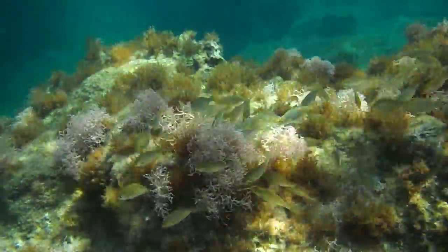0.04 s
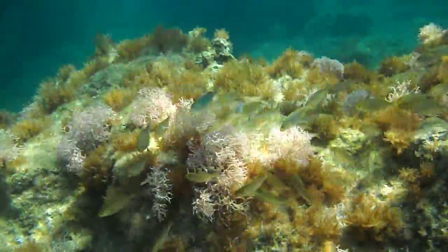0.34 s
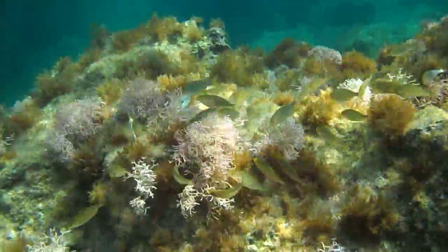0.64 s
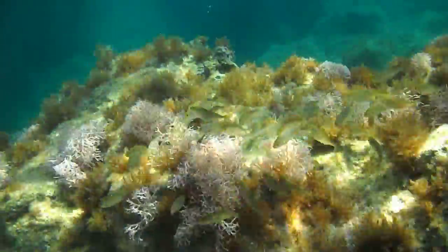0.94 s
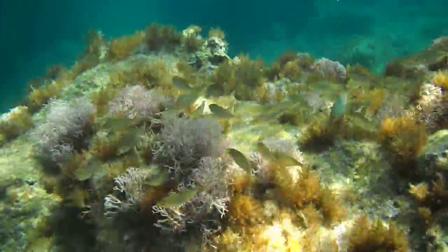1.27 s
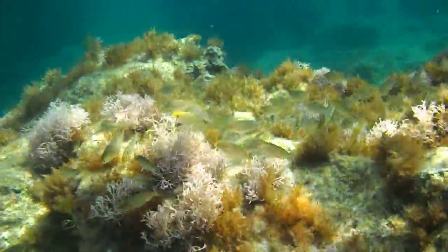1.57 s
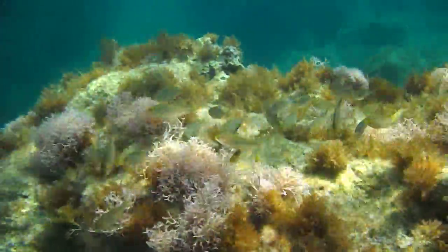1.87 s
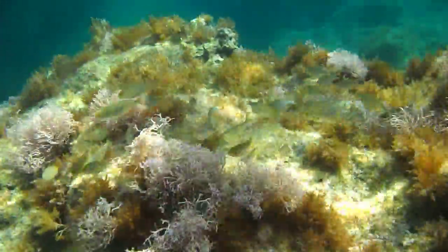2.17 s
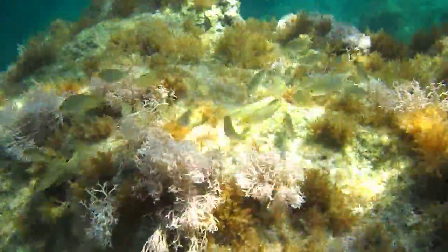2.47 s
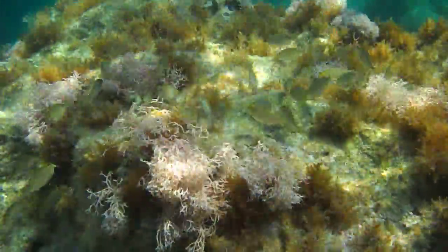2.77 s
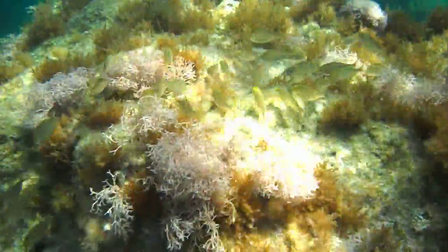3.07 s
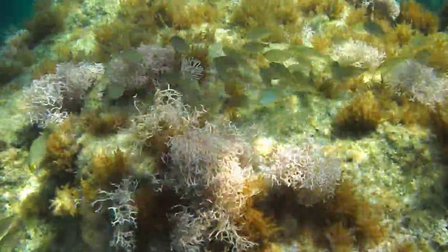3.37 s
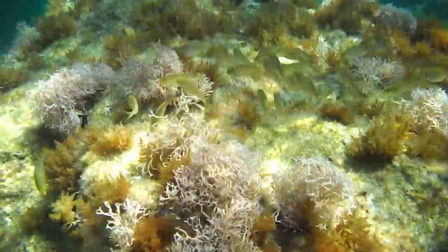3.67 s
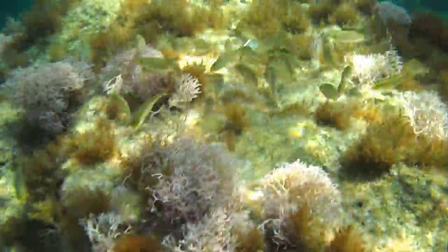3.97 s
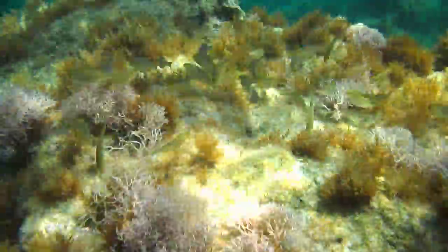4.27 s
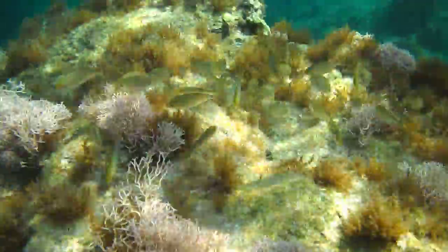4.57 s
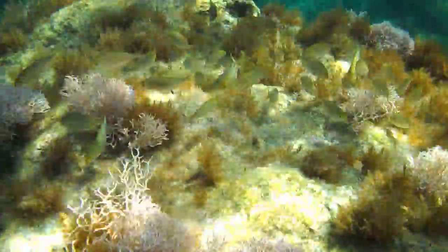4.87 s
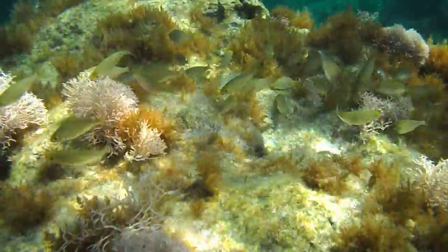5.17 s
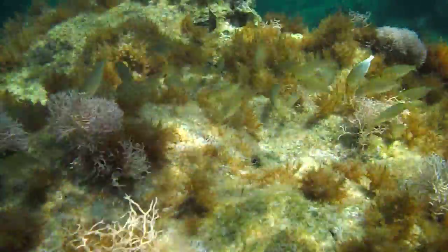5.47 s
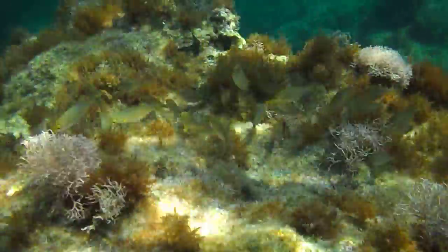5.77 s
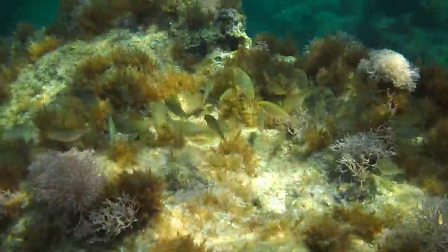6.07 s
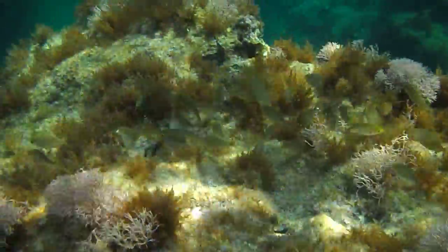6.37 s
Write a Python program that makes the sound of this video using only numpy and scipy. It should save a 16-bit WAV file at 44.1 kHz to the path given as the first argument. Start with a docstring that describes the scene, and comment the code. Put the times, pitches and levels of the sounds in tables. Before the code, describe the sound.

Sharp shrimp clicks and crackles cut through a close, high electronic buzz, over a soft underwater wash with small bubbles.

```python
"""Shallow sea, over a weedy rock, heard from one camera microphone inside a waterproof housing.
From the start the electronics whine close by; snapping shrimp click near and far and ring the housing,
small bubbles plink in a soft wash of water, and a faint, distant motor comes and goes as it slows.
The housing knocks at 1.4 s, and a cloud of bubbles gurgles at 4.1 s.
Just after 5 s the housing knocks twice more, then gives one stick-slip squeak."""
import sys
import numpy as np
from scipy import signal
from scipy.fft import rfft, irfft, next_fast_len
from scipy.io import wavfile
from scipy.ndimage import uniform_filter1d

SR = 44100
rng = np.random.default_rng(int(sys.argv[2]) if len(sys.argv) > 2 else 0)


def materialize(psi):
    """Save the field psi as 16-bit PCM at rate SR to the path in sys.argv[1].

    A 1-D psi becomes a single channel; in a 2-D psi each row is a channel.
    """
    bounded = np.clip(np.atleast_2d(psi).T, -1, 1)
    quanta = np.round(bounded * 32767).astype(np.int16)
    wavfile.write(sys.argv[1], SR, quanta)


N = 292816

# colour of the buzz around the whine and around its mirror image: (frequency [Hz], gain [dB])
WHINE_BUZZ = [(3000, -10), (5000, 9), (6000, 9), (7000, 9), (8000, 8.5), (9800, 8), (10330, 6.5),
              (10660, 2.5), (10820, -0.56), (11000, -6), (11470, -24), (12000, -48)]
MIRROR_BUZZ = [(9000, -46), (10330, -23), (10820, -2.5), (11200, -0.5), (11470, -1.5), (11880, -9),
               (12130, -44), (12400, -48)]
# shrimp near the microphone: (time [s], level [dB], centre [Hz], body lift [dB], edge lift [dB])
NEAR_SNAPS = [(0.2653, -34, 3500, 2, 4), (0.3884, -39.5, 3500, 0, -5), (0.6199, -35, 3800, 8, -9),
              (0.6858, -28.5, 3470, 4, 6), (0.7445, -37, 4400, -5, 12), (0.7973, -35, 3800, 0, 1),
              (0.847, -31, 4200, 20, 20), (0.9423, -24.5, 2600, 7, -2), (1.0235, -37, 4500, -16, 4),
              (1.4026, -25, 4060, -5, 9), (1.7981, -39.5, 3900, -11, 8), (1.9096, -39.0, 4000, -1, 16),
              (1.9339, -29, 3200, 16, 3), (1.9913, -36, 3800, 10, -14), (2.0714, -36.5, 3850, -4, 4),
              (2.1525, -13, 4200, 5, 4), (2.4017, -35.5, 4100, 4, -6), (2.5668, -31.5, 4280, -10, -12),
              (2.6313, -30, 4100, -18, -7), (2.7712, -34.0, 3500, -6, 11), (2.8515, -37.5, 4100, -6, -5),
              (3.226, -15.5, 3770, -5.5, 4.5), (3.4266, -30.5, 3700, -8, -4), (3.4986, -29.5, 3800, -6, 13),
              (3.527, -35.5, 3600, 0, 2), (3.659, -28, 3530, 3, 2), (3.6895, -26.5, 3900, 1, -20),
              (3.8259, -34, 3800, 13, -6), (4.0289, -33.5, 4100, 0, 9), (4.0445, -30.5, 3700, -3, 10),
              (4.3901, -28.5, 3800, -2, -9), (4.9198, -33.5, 3400, -4, 13), (4.93, -35, 4000, -11, -5),
              (4.9916, -36.5, 3850, -5, -5), (5.0564, -36.5, 3000, 24, 3), (5.1112, -32.0, 4000, 0, -16),
              (5.2346, -19.5, 3600, 4.5, -16), (5.419, -38.5, 3750, 3, -5), (5.4989, -30, 3600, 2, 7),
              (5.688, -22.5, 3400, 0, 10), (5.718, -30, 4400, 1, 3), (5.7955, -33.5, 3680, -2, 9),
              (6.2508, -36, 4300, 8, 6), (6.323, -22.0, 2740, 18, -5), (6.3753, -31.5, 4120, -2, 3)]
# a snap heard through the housing wall: (frequency [Hz], gain [dB])
SNAP_COLOUR = [(50, -53), (500, -35), (1100, -26), (1400, -19), (2200, -11), (2700, -16), (3200, -1.5),
               (3900, 1.5), (4500, -1), (5100, -12), (5900, -7), (7000, -15.5), (10000, -20.5),
               (12500, -65)]
# knocks on the housing: (time [s], level [dB], ring [Hz])
HOUSING_KNOCKS = [(1.445, -22, 1060), (5.088, -19, 1096), (5.38, -14, 1110)]
# the housing's response to a knock: (frequency [Hz], gain [dB])
KNOCK_RESPONSE = [(60, -49), (250, -27), (500, -8.5), (800, 6.5), (1100, 4), (1400, 0), (1800, -15.5),
                  (3000, -15), (4500, -32), (9000, -60)]
# bubble sizes in the cloud: (pitch [Hz], spread [Hz], relative level [dB])
CLOUD_SIZES = [(846, 57, -17), (1142, 36, -5.5), (1656, 57, 3.5), (1894, 48, -2.5), (2590, 200, 1),
               (4110, 460, 1.5)]
# bubbles that stand clear of the wash: (time [s], level before lift [dB], pitch [Hz])
CLEAR_BUBBLES = [(0.053, -47.5, 770), (0.083, -44, 2630), (0.359, -40, 1175), (0.493, -43, 950),
                 (0.659, -41, 770.0), (0.687, -38.5, 1154), (0.945, -42, 1180), (0.975, -44, 1090.0),
                 (1.565, -42, 1090.0), (1.61, -39.5, 1150.0), (1.947, -34.5, 2120), (2.253, -41, 1157),
                 (2.414, -31.5, 1090), (2.895, -41, 815), (3.452, -43, 875), (3.533, -41.0, 690),
                 (3.598, -43, 740), (3.623, -38, 1130), (4.404, -43, 1140), (6.025, -42, 950),
                 (6.29, -39, 1560.0), (6.55, -36, 910.0)]
# handling bumps on the housing: (time [s], peak level [dB], pitch [Hz])
HANDLING_BUMPS = [(0.048, -57, 190), (0.855, -61, 163), (2.706, -61, 199), (3.262, -59, 178),
                  (3.489, -50, 192), (4.994, -63, 129), (5.643, -59, 227), (6.4, -59, 205)]
# moving water and countless distant snaps: (frequency [Hz], relative level [dB])
WASH_SPECTRUM = [(30, -46), (90, -37), (190, -19), (300, -23), (720, -10.5), (1150, -7), (1350, -13),
                 (1900, -4), (2600, -11.5), (3500, 0.5), (4200, -1.5), (5100, -14), (6300, -9),
                 (11500, -13.5)]
# partials of the distant motor: (multiple of shaft speed [1], relative level [dB])
SHAFT_ORDERS = [(3, -12.5), (4, -0.5), (5, -8), (7, -4.5)]
# the motor as it reaches the microphone: (time [s], level [dB])
MOTOR_SWELL = [(0, -72), (.5, -53), (2.2, -63), (2.6, -55.5), (3.3, -55.5), (3.8, -69), (4.8, -69),
               (5.05, -52), (6.64, -55.5)]


def gain_of(db):
    """Decibels to amplitude."""
    return 10 ** (np.asarray(db) / 20)


def unit_rms(x):
    """Scales to rms 1."""
    return x / np.sqrt(np.mean(x ** 2) + 1e-20)


def unit_peak(x):
    """Scales to peak 1."""
    return x / (abs(x).max() + 1e-20)


def wander(size, smooth_samples):
    """Smoothed random motion of rms 1."""
    return unit_rms(uniform_filter1d(rng.standard_normal(size), size=smooth_samples))


def db_at(spectrum, hz):
    """Reads a spectrum on a log-frequency axis."""
    points_hz, db = np.transpose(spectrum)
    return np.interp(np.log(hz + 1), np.log(points_hz + 1), db)


def add(mix, s, sound):
    """Adds a sound into the mix at time s."""
    part = mix[max(round(s * SR), 0):][:len(sound)]
    part += sound[:len(part)]


def ringing(db):
    """Impulse response with the given gains from 0 to SR / 2, ringing only after the blow."""
    log_gain = np.log(gain_of(np.r_[db, db[-2:0:-1]]))
    return np.fft.ifft(np.exp(np.conj(signal.hilbert(log_gain)))).real


def short_axes(size=2048):
    """Times and frequencies of one short event."""
    return np.arange(size) / SR, np.fft.rfftfreq(size, 1 / SR)


def camera_whine(whine_hz=10780.85, mirror_hz=11269.15, flips_per_s=81.673, first_flip_s=.00592):
    """Close electronics give one high buzzing whine, heard with a fainter mirror image just above."""
    size = next_fast_len(N + SR // 4)
    t, hz = np.arange(size) / SR, np.fft.fftfreq(size, 1 / SR)
    swing = np.sin(np.pi * flips_per_s * (t - first_flip_s))
    flips = np.clip(swing * SR / (np.pi * flips_per_s), -1, 1)  # each flip of sign ticks: the buzz
    out = np.zeros(N)
    for tone_hz, db, colour in ((whine_hz, -25.5, WHINE_BUZZ), (mirror_hz, -30, MIRROR_BUZZ)):
        lines = np.fft.fft(flips * np.exp(2j * np.pi * tone_hz * t)) * (hz > 0)
        out += np.sqrt(2) * np.fft.ifft(lines * gain_of(db + db_at(colour, abs(hz)))).real[:N]
    return out


def snap(centre_hz, body_db, edge_db, ring_s=.0018, echo_db=-24, echo_s=.011):
    """A collapsing cavity cracks and rattles the housing; the rock returns a bounce and a tail."""
    t, hz = short_axes()

    def band(middle_hz, octaves):
        return np.exp(-(np.log2((hz + 1) / middle_hz) / octaves) ** 2)

    colour = db_at(SNAP_COLOUR, hz) + 5 * band(centre_hz, .13)
    colour += body_db * band(2270, .76) + edge_db * band(6180, .28)
    bounce_s = .0105 * rng.uniform(.58, 1.37)
    bounce = gain_of(-19) * np.exp(-((t - bounce_s) / .0019) ** 2)
    tail = gain_of(echo_db) * np.exp(-t / echo_s)
    burst = rng.standard_normal(len(t)) * (np.exp(-t / ring_s) + bounce + tail)
    burst[0] += 3  # the crack itself
    sound = signal.fftconvolve(burst, ringing(colour))[:len(t)]
    return sound * np.sqrt(.012 * SR) / np.linalg.norm(sound)  # the energy of 12 ms at rms 1


def near_shrimp():
    """Shrimp close to the microphone fire loud single snaps."""
    out = np.zeros(N)
    for s, db, centre_hz, body_db, edge_db in NEAR_SNAPS:
        add(out, s, gain_of(db) * snap(centre_hz, body_db, edge_db))
    return out


def housing_knocks(rebound_gain=.44, rebound_s=.001774, lag_s=.00069, usual_ring_hz=1100):
    """Dull taps on the shell around the microphone, each with a small rebound."""
    out = np.zeros(N)
    _, hz = short_axes()
    for s, db, ring_hz in HOUSING_KNOCKS:
        colour = db_at(KNOCK_RESPONSE, hz * usual_ring_hz / ring_hz)
        tap = gain_of(db) * unit_peak(ringing(colour))
        add(out, s + lag_s, tap)
        add(out, s + lag_s + rebound_s, rebound_gain * tap)
    return out


def housing_squeak(start_s=5.5075, length_s=.037, pitch_hz=3033, grip_s=.02, echo_s=.029):
    """Close stick-slip: a tone swoops down, grips louder and higher, and swoops up as it lets go."""
    t = np.arange(0, length_s, 1 / SR)
    grip = .5 + .5 * np.tanh((t - grip_s) / .00092)
    swoops = np.exp(-t / .0019) + np.exp((t - length_s) / .0011)
    hz = pitch_hz * (1 + .92 * swoops + grip * (.14 + 17 * (t - grip_s)))
    attack = np.minimum(t / .004, 1)
    release = np.exp(-np.maximum(t - .025, 0) / .0049)
    level = gain_of(-17.5 + 6.5 * grip) * attack * release
    phase = 2 * np.pi * np.cumsum(hz * (1 + .022 * wander(len(t), 24))) / SR
    tone = np.sqrt(2) * level * (np.sin(phase) + gain_of(-21) * np.sin(2 * phase))
    lag, _ = short_axes()
    scatter = rng.standard_normal(len(lag)) * np.exp(-lag / echo_s)
    echo = gain_of(-22) * signal.fftconvolve(tone, scatter / np.linalg.norm(scatter))
    out = np.zeros(N)
    add(out, start_s, tone)
    add(out, start_s, echo)
    return out


def plink(hz, rise_s, decay_s, glide_per_s=0, wobble=.045):
    """A damped resonance with a soft start and an unsteady pitch that can glide."""
    t, _ = short_axes(size=4096)
    pitch_hz = hz * (1 + glide_per_s * t + wobble * wander(len(t), 100))
    phase = 2 * np.pi * np.cumsum(pitch_hz) / SR
    envelope = (1 - np.exp(-t / rise_s)) ** 2 * np.exp(-t / decay_s)
    return unit_peak(envelope * np.sin(phase))


def bubble_cloud(start_s=4.126, length_s=.31, per_s=1500, decay_cycles=7, fade_db_per_s=50):
    """Hundreds of bubbles escape at once and ring; the smallest merge into a fizz that surges early."""
    lead_s = .026  # the cloud is already dense when it breaks out
    t = np.arange(-lead_s, length_s, 1 / SR)
    cloud = np.zeros(len(t))
    for k, s in enumerate(np.arange(0, t[-1] - t[0], 1 / per_s)):
        hz, spread_hz, db = CLOUD_SIZES[k % len(CLOUD_SIZES)]
        pitch, loud, late = rng.standard_normal(3)
        bubble = plink(hz + spread_hz * pitch, rise_s=.0021, decay_s=decay_cycles / hz,
                       glide_per_s=1.4, wobble=.018)
        add(cloud, s + .004 * late, gain_of(db + 3 * loud) * bubble)
    fizz_band = signal.butter(2, [1600, 6000], "bandpass", fs=SR, output="sos")
    fizz = unit_rms(signal.sosfilt(fizz_band, rng.standard_normal(len(t))))
    surge = gain_of(-9) + gain_of(-2) * np.exp(-((t - .043) / .0099) ** 2)
    gate = np.clip(np.minimum(t / .0066, (length_s - t) / .067), 0, 1)  # quick attack, slower release
    level = gate * gain_of(-30.5 - fade_db_per_s * t)
    out = np.zeros(N)
    add(out, start_s - lead_s, level * (unit_rms(cloud) + surge * fizz))
    return out


def single_bubbles(clear_lift_db=1, faint_per_s=32, tiny_per_s=9):
    """Bubbles ring one by one: a few clear, a scatter of faint ones, and ticks from the tiniest."""
    out = np.zeros(N)
    for s, db, hz in CLEAR_BUBBLES:
        add(out, s, gain_of(db + clear_lift_db) * plink(hz, rise_s=.002, decay_s=.0065, wobble=.055))
    for when, size, pitch in rng.random((int(faint_per_s * N / SR), 3)):
        db = -50 - .5 * np.log(1 - .95 * size)
        bubble = plink(760 * 3.2 ** pitch, rise_s=.00057, decay_s=.0024, glide_per_s=1.1)
        add(out, when * N / SR, gain_of(db) * bubble)
    for when, pitch in rng.random((int(tiny_per_s * N / SR), 2)):
        tick = plink(1500 + 1200 * pitch, rise_s=.0007, decay_s=.0041, glide_per_s=1.5)
        add(out, when * N / SR, gain_of(-44) * tick)
    return out


def far_shrimp(per_s=45, faintest_db=-52, spread_db=4, range_db=11.5):
    """Farther off, the colony crackles with faint, dry snaps; the nearer and louder, the rarer."""
    out = np.zeros(N)
    for when, nearness, pitch, body, edge in rng.random((int(per_s * N / SR), 5)):
        db = faintest_db + min(-spread_db * np.log(1 - nearness), range_db)
        tick = snap(3000 + 1600 * pitch, -3 + 14 * body, -5 + 18 * edge, ring_s=.0013, echo_db=-35)
        add(out, when * N / SR, gain_of(db) * tick)
    return out


def water_wash(level_db=-43, flutter_db=1.86):
    """The ambience of the shallows: distant snaps and moving water merge into a fluttering hiss."""
    size = next_fast_len(N)
    colour = gain_of(db_at(WASH_SPECTRUM, np.fft.rfftfreq(size, 1 / SR)))
    hiss = irfft(rfft(rng.standard_normal(size)) * colour, size)[:N]
    flutter = gain_of(flutter_db * wander(N, 1200))
    return gain_of(level_db) * unit_rms(hiss * flutter)


def handling_bumps():
    """Handling noise: the housing gives low, very soft thuds."""
    out = np.zeros(N)
    for s, db, hz in HANDLING_BUMPS:
        add(out, s, gain_of(db) * plink(hz, rise_s=.0047, decay_s=.0072, glide_per_s=-.38))
    return out


def distant_motor(start_hz=514, end_hz=482, slowing_s=6.1, waver=.00294):
    """Far from the microphone, four thin, wavering orders of one shaft that slows and settles."""
    t = np.arange(N) / SR
    shaft_hz = end_hz + (start_hz - end_hz) * np.maximum(1 - t / slowing_s, 0) ** 2
    phase = 2 * np.pi * np.cumsum(shaft_hz * (1 + waver * wander(N, 1500))) / SR
    tone = sum(gain_of(db) * np.sin(order * phase) for order, db in SHAFT_ORDERS)
    level = gain_of(np.interp(t, *np.transpose(MOTOR_SWELL)))
    return level * unit_rms(tone)


def scene():
    """The sea outside, the housing and the electronics within, all at one microphone."""
    sea = near_shrimp() + far_shrimp() + single_bubbles() + bubble_cloud()
    background = water_wash() + distant_motor()
    housing = housing_knocks() + handling_bumps() + housing_squeak()
    return (sea + background + housing + camera_whine())[None]


def record(dry, band_limit_hz=12300):
    """The loudest snaps overload the microphone input a little unevenly; the top treble is cut off."""
    clipped = np.clip(dry, -.745, .72)
    lowpass = signal.firwin(511, band_limit_hz, window=("kaiser", 9), fs=SR)
    return signal.oaconvolve(clipped, lowpass[None], "same")


dry = scene()
out = record(dry)
materialize(out)
```